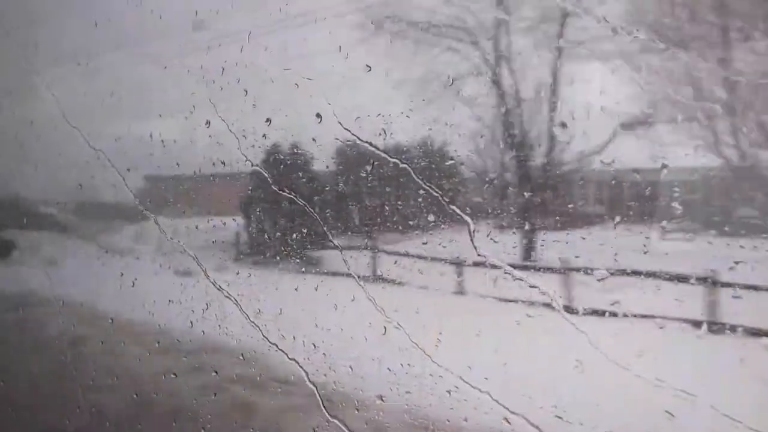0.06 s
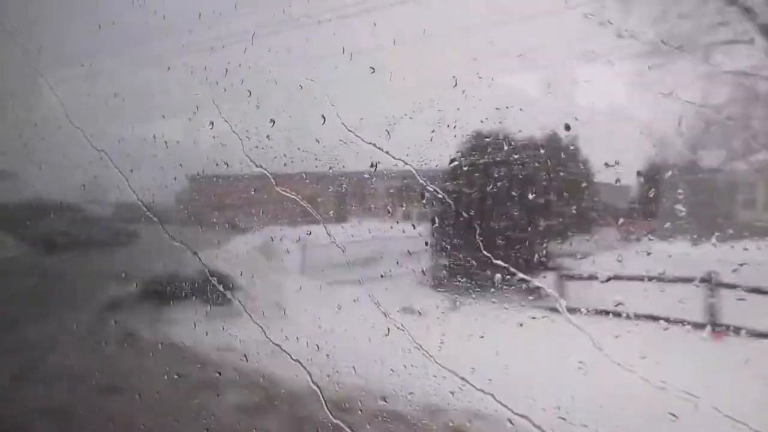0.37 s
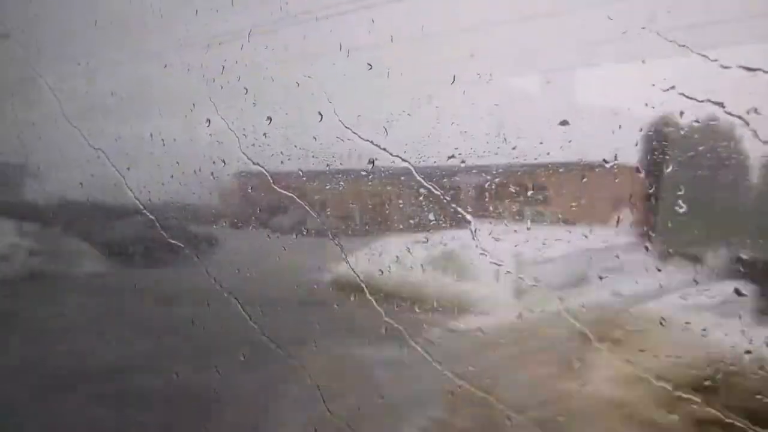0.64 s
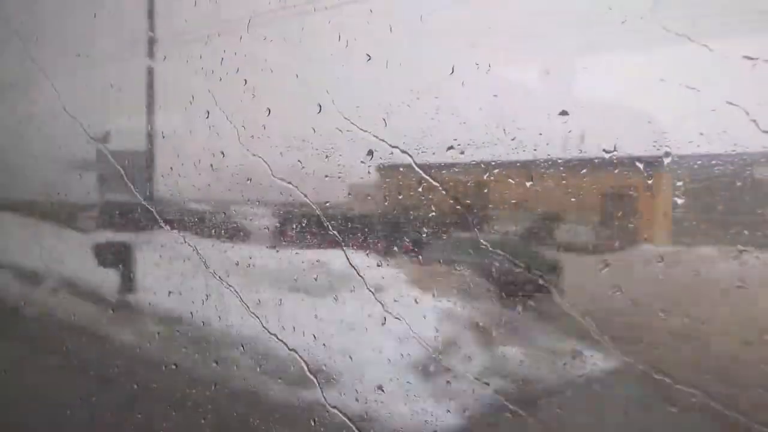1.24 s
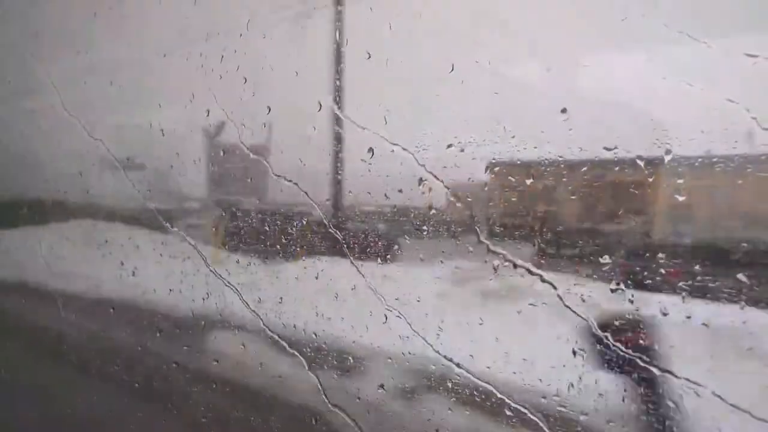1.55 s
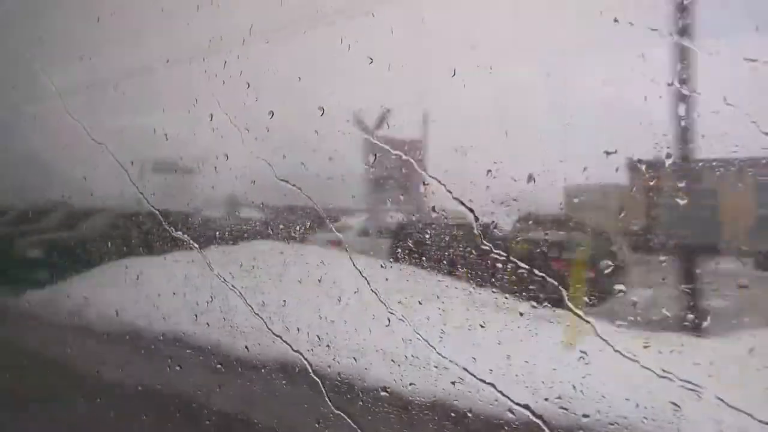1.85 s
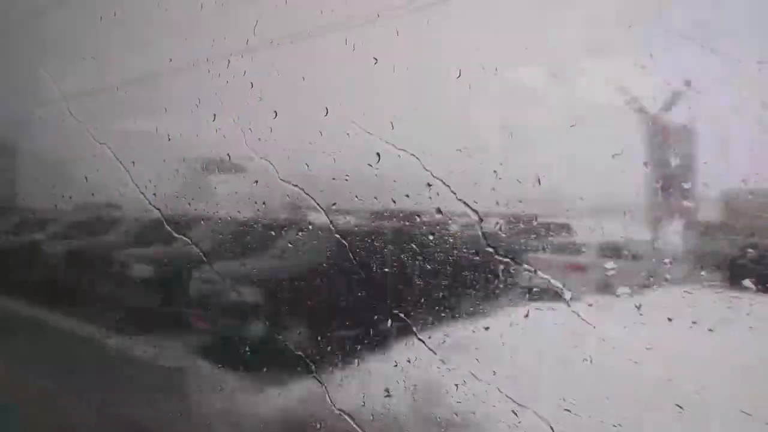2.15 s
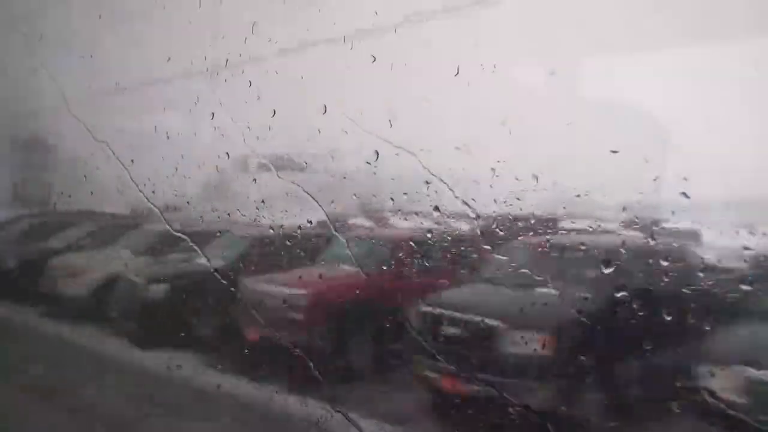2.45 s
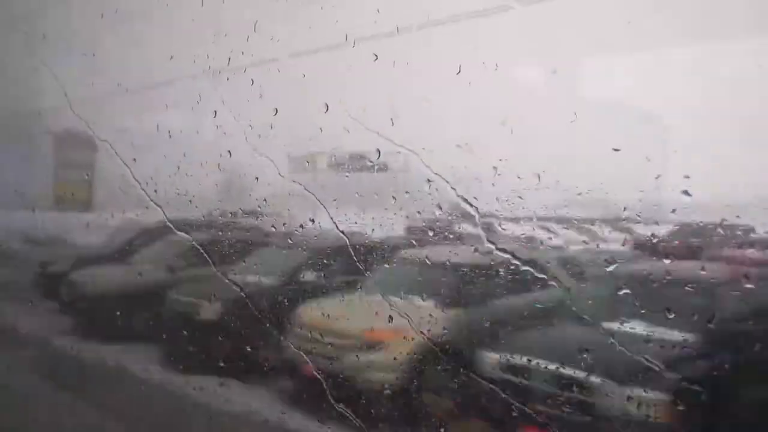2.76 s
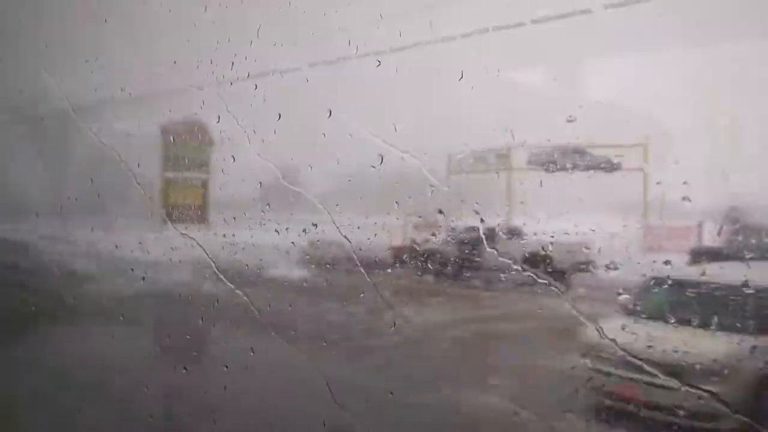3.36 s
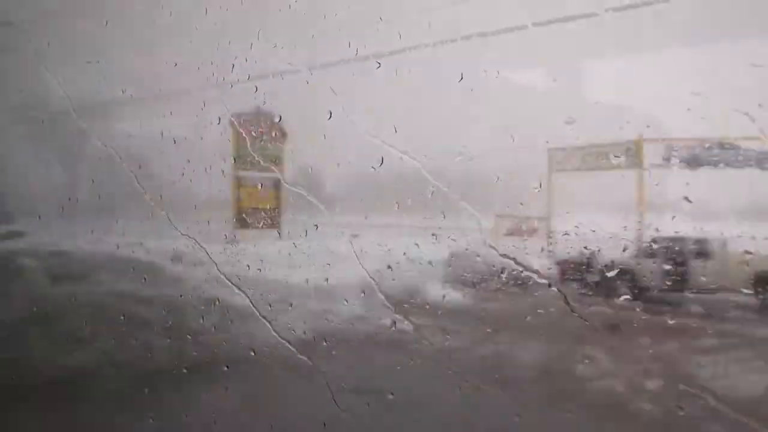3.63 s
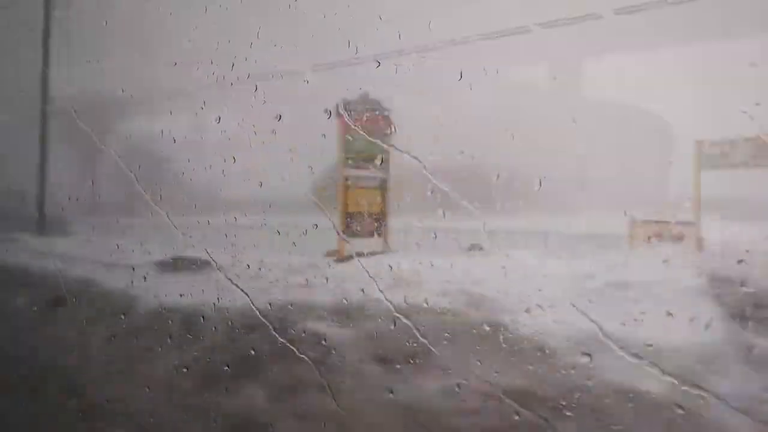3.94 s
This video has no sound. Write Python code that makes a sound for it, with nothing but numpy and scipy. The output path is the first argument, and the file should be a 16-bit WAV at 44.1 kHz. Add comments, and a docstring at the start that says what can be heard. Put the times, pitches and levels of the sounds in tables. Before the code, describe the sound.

A bus rumbles low on a slushy road, heard from inside with wet tyre hiss.

```python
"""A deep, throbbing boom fills a bus as a slushy road shakes its body.
The diesel engine hums under load, then eases off after about two seconds, while the drive
shaft, gears and axle drone along. The hiss and roar of the wet tyres keep dipping and coming back.
A loose fitting ticks and squeaks faintly, and a limiter holds the loudest rumbles down."""
import sys
import numpy as np
from scipy import signal
from scipy.fft import rfft, irfft
from scipy.io import wavfile

SR = 44100
rng = np.random.default_rng(int(sys.argv[2]) if len(sys.argv) > 2 else 0)


def transcribe(u):
    """Save the signal u as a 16-bit wav file named by the first command-line argument.

    u: samples, shape (n,) or (channels, n), limited to [-1, 1]; the rate is SR.
    q: integer samples, one column per channel.
    """
    v = np.clip(np.atleast_2d(u).T, -1, 1)
    q = np.round(v * 32767).astype(np.int16)
    wavfile.write(sys.argv[1], SR, q)


N = 176400
TIME = np.arange(N) / SR


def from_db(db):
    """Turn decibels into a number to multiply a sound by."""
    return 10 ** (np.asarray(db) / 20)


def rms_one(x):
    """Scale a signal so its average strength (rms) is one."""
    return x / np.sqrt(np.mean(x ** 2) + 1e-20)


def in_time(rows):
    """Join (time_s, value) points with straight lines."""
    return np.interp(TIME, *np.transpose(rows))


def drift(rate_hz):
    """A smooth random wander of about one either way; a higher rate moves faster."""
    step, warm_up = 40, 2000
    r = np.exp(-2 * np.pi * step * rate_hz / SR)
    noise = rng.standard_normal(N // step + warm_up + 2)
    slow = signal.lfilter([1], [1, -2 * r, r * r], noise)[warm_up:]
    return np.interp(np.arange(N) / step, np.arange(len(slow)), rms_one(slow))


def coloured(points):
    """Noise shaped by (pitch_hz, relative_db) points, fading steeply beyond both ends."""
    hz, db = np.transpose(points)
    f = np.maximum(np.arange(N // 2 + 1) * SR / N, 1)
    edges = 1 / np.sqrt((1 + (hz[0] / 2 / f) ** 8) * (1 + (f / hz[-1] / 2) ** 8))
    shape = from_db(np.interp(np.log(f), np.log(hz), db))
    return rms_one(irfft(rfft(rng.standard_normal(N)) * edges * shape, N))


def resonant(hz, width_hz):
    """Noise that rings around one pitch; the narrower, the more like a note."""
    r = np.exp(-np.pi * width_hz * np.sqrt(2) / SR)
    ring = [1 - r, 0, r - 1, 1, -2 * r * np.cos(2 * np.pi * hz / SR), r * r]
    return rms_one(signal.sosfilt([ring, ring], rng.standard_normal(N + SR))[SR:])


def loose_fitting():
    """A loose part scuffs, making short bright ticks and tiny squeaks."""
    # each tick: start_s, level_db
    ticks = [(.817, -43.5), (1.811, -38.5), (1.880, -55)]
    # tone of the ticks: pitch_hz, relative_db
    tick_colour = [(3000, -15), (5500, -1), (8000, -4), (11000, 0), (13000, -2), (15500, -3.5)]
    # each squeak: peak_s, pitch_hz, level_db
    squeaks = [(1.289, 9600, -51), (1.325, 10300, -58), (1.884, 13550, -46), (1.884, 10300, -51)]
    rise_s, hold_s, fade_s, squeak_s = .003, .0049, .053, .0048
    tick_level = squeaking = 0
    for start_s, db in ticks:
        fade_db = 60 * np.maximum(TIME - start_s - rise_s - hold_s, 0) / fade_s
        tick_level += from_db(db - fade_db) * np.clip((TIME - start_s) / rise_s, 0, 1)
    for peak_s, hz, db in squeaks:
        pulse = np.exp(-((TIME - peak_s) / squeak_s) ** 2)
        squeaking += from_db(db) * pulse * resonant(hz, width_hz=250)
    return tick_level * coloured(tick_colour) + squeaking


def gears_and_axle(load, shift_db):
    """Gears and axle give unsteady hums that dip and recover along with the hiss and rumble."""
    # each hum: pitch_hz, width_hz, loaded_db, coasting_db
    hums = [(298.3, 4.1, -43.5, -40.5), (282.7, 4.4, -44, -44), (247.2, 7.1, -43, -49.5)]
    out = 0
    for hz, width_hz, loaded_db, coasting_db in hums:
        out += from_db(coasting_db + load * (loaded_db - coasting_db)) * resonant(hz, width_hz)
    return from_db(1.36 * shift_db) * out


def tyres(average_db, shift_db):
    """Wet tyres roar and throw spray that rings in the panels; it all dips and recovers together."""
    # roar through the floor: pitch_hz, relative_db
    roar_colour = [(90, 1.5), (140, -0.5), (195, -0.5), (235, -8.5), (295, -2.5), (360, -9), (450, -12),
                   (600, -16), (900, -27)]
    # spray off the tyres: pitch_hz, relative_db
    spray_colour = [(400, -7), (750, -2), (1000, 5), (1400, 0), (1750, -5.5), (2200, -4), (2800, -5),
                    (3400, -9.5), (4300, -15.5), (5400, -13.5), (7500, -17), (10000, -21.5), (12500, -24),
                    (15500, -28.5)]
    # ringing panels: pitch_hz, width_hz, relative_db
    panels = [(1182, 62, -9), (1554, 137, -8), (1920, 61, -15), (2624, 160, -14.5)]
    roar_db, spray_db = 8.5, -1.5  # added to the average level
    waver_db = shift_db + .42 * drift(30)
    roar = from_db(roar_db + .92 * waver_db) * coloured(roar_colour)
    spray = from_db(spray_db + .7 * drift(60)) * coloured(spray_colour)
    ringing = sum(from_db(db) * resonant(hz, width_hz) for hz, width_hz, db in panels)
    return from_db(average_db) * (roar + from_db(waver_db) * (spray + ringing))


def drive_shaft():
    """The spinning shaft makes a wavering drone that sinks as the bus slows."""
    # the drone swelling and fading: time_s, level_db
    drone_levels = [(0, -20), (.2, -23), (.45, -29), (.8, -24), (1.05, -30), (1.35, -27), (1.6, -23),
                    (1.9, -32), (2.2, -30), (2.5, -27), (2.8, -21.5), (3.05, -28), (3.35, -21.5),
                    (3.7, -24.5), (4, -30)]
    start_hz, sink_hz_per_s, wobble = 87.7, .5975, .01202
    hz = (start_hz - sink_hz_per_s * TIME) * (1 + wobble * drift(6.05))
    level = from_db(in_time(drone_levels) + 2 * drift(5.5))
    return level * np.sqrt(2) * np.sin(2 * np.pi * np.cumsum(hz) / SR)


def engine(load):
    """The diesel hums at multiples of its firing rate; the higher notes fade most as it eases off."""
    # how fast the cylinders fire: time_s, rate_hz
    firing = [(0, 58.52), (.6, 58.16), (1.3, 58.06), (2.0, 58.06), (2.6, 57.74), (3.3, 57.6), (4, 57.63)]
    # engine notes: multiple, loaded_db, coasting_db
    notes = [(1, -27, -30), (2, -29.5, -40), (3, -31.5, -52.5), (5, -35.5, -51.5)]
    wobble = .0015
    phase = 2 * np.pi * np.cumsum(in_time(firing) * (1 + wobble * drift(2.42))) / SR
    out = 0
    for multiple, loaded_db, coasting_db in notes:
        level = from_db(coasting_db + load * (loaded_db - coasting_db) + drift(3.6))
        out += level * np.sqrt(2) * np.sin(multiple * phase + 2 * np.pi * rng.random())
    return out


def bus_body(shift_db):
    """The body bounces at a very low, wandering note; the road shakes it into a booming rumble."""
    # strength of the bounce: time_s, level_db
    bounce_levels = [(0, -21.5), (.7, -20.5), (1.15, -16), (1.5, -19.5), (1.85, -20.5), (2.05, -15),
                     (2.35, -15.5), (2.55, -22), (2.85, -16), (3.2, -22), (3.55, -17), (4, -18.5)]
    # booms of the cabin air: pitch_hz, width_hz, level_db
    air_booms = [(37.4, 10.4, -26.5), (82.4, 23, -30.5)]
    # bumps in the road: peak_s, level_db
    bumps = [(.05, -28.5), (.25, -31), (.43, -30), (.73, -34), (.87, -29.5), (1.88, -30), (2.47, -27),
             (3.75, -27.5)]
    # tone of the bumps: pitch_hz, relative_db
    bump_colour = [(110, 3), (190, 1), (300, -3), (450, -12.5), (700, -23.5)]
    # tone of the road rumble: pitch_hz, relative_db
    rumble_colour = [(8, -1.5), (25, -5), (45, -1), (68, -4.5), (95, -7.5), (130, -6.5), (180, -17),
                     (240, -22), (400, -42)]
    bounce_hz, wobble, bump_s = 20.52, .0876, .038
    phase = 2 * np.pi * np.cumsum(bounce_hz * (1 + wobble * drift(5.9))) / SR
    bounce = from_db(in_time(bounce_levels) + .8 * drift(5.3)) * np.sqrt(2) * np.sin(phase)
    booms = sum(from_db(db) * resonant(hz, width_hz) for hz, width_hz, db in air_booms)
    bump_level = sum(from_db(db) * np.exp(-((TIME - peak_s) / bump_s) ** 2) for peak_s, db in bumps)
    thuds = bump_level * coloured(bump_colour)
    rumble = from_db(-23) * coloured(rumble_colour)
    return bounce + thuds + from_db(.6 * shift_db) * (booms + rumble)


def scene():
    """Everything as heard from a window seat."""
    # the hiss dipping and recovering; roar, hums and rumble follow it: time_s, level_db
    hiss_levels = [(0.0, -35), (0.06, -35), (0.18, -40), (0.22, -34), (0.28, -38), (0.34, -33.5),
                   (0.36, -39), (0.44, -35), (0.48, -39.5), (0.52, -34), (0.6, -42), (0.68, -35.5),
                   (0.7, -39.7), (0.74, -33.5), (0.8, -40), (0.88, -35), (0.9, -39.5), (0.98, -34.5),
                   (1.0, -38), (1.16, -39.4), (1.22, -41.5), (1.24, -39.5), (1.3, -42.5), (1.34, -34),
                   (1.46, -38), (1.56, -37.3), (1.58, -40.7), (1.68, -37), (1.72, -42), (1.76, -34),
                   (1.8, -39), (1.9, -34), (1.94, -41), (1.98, -37.5), (2.0, -44.5), (2.08, -38),
                   (2.1, -43), (2.16, -39.1), (2.2, -42.5), (2.25, -40), (2.31, -45.7), (2.51, -35.5),
                   (2.71, -38), (2.73, -33.5), (2.75, -41), (2.85, -41), (2.91, -35.9), (2.95, -41),
                   (3.03, -35.3), (3.07, -40.3), (3.09, -36), (3.45, -35.5), (3.57, -42), (3.77, -35),
                   (3.83, -40), (3.87, -38), (3.95, -40.5), (4.0, -38.5)]
    ease_middle_s, ease_length_s = 1.957, .38
    load = np.clip(.5 - (TIME - ease_middle_s) / ease_length_s, 0, 1)  # 1 pulling, 0 coasting
    hiss_db = in_time(hiss_levels)
    average_db = hiss_db.mean()
    shift_db = hiss_db - average_db
    machinery = gears_and_axle(load, shift_db) + engine(load) + drive_shaft()
    return (machinery + bus_body(shift_db) + tyres(average_db, shift_db) + loose_fitting())[None]


def record(dry):
    """A limiter quickly turns down the loudest peaks, and the highest treble is cut."""
    limit_db, recover_db_per_s, react_s, cutoff_hz = -7.5, 72, .0015, 15700
    over_db = np.maximum(20 * np.log10(np.abs(dry[0]) + 1e-9) - limit_db, 0)
    ramp_db = recover_db_per_s * TIME
    dip_db = np.maximum.accumulate(over_db + ramp_db) - ramp_db  # jumps at a peak, then lets go
    r = np.exp(-1 / (react_s * SR))
    smooth_dip_db = signal.lfilter([1 - r], [1, -r], dip_db)
    fade_in = np.minimum(TIME / .004, 1)
    treble_cut = signal.ellip(12, .1, 90, cutoff_hz, fs=SR, output="sos")
    return signal.sosfilt(treble_cut, dry * from_db(-smooth_dip_db) * fade_in)


dry = scene()
out = record(dry)
transcribe(out)
```